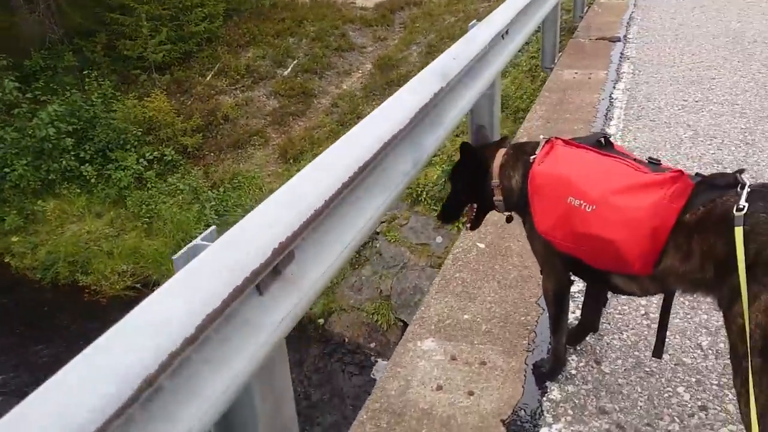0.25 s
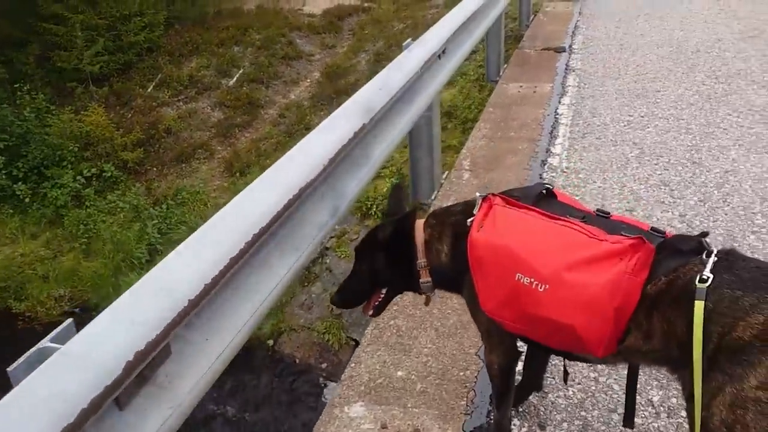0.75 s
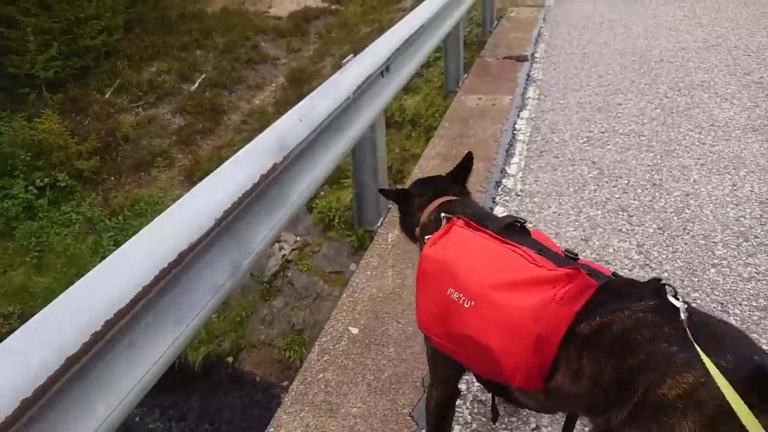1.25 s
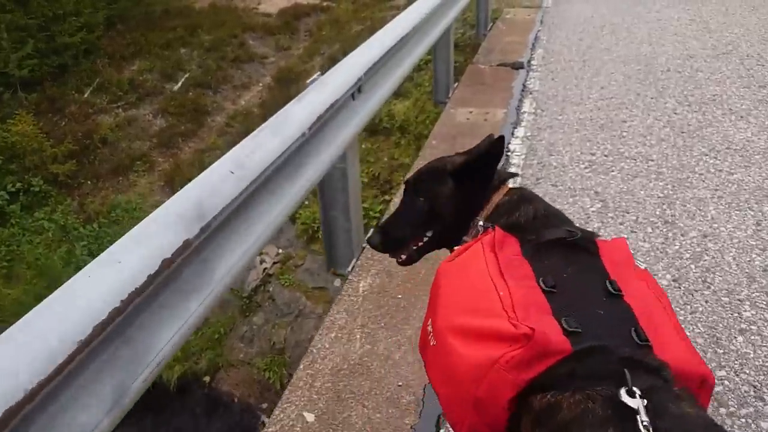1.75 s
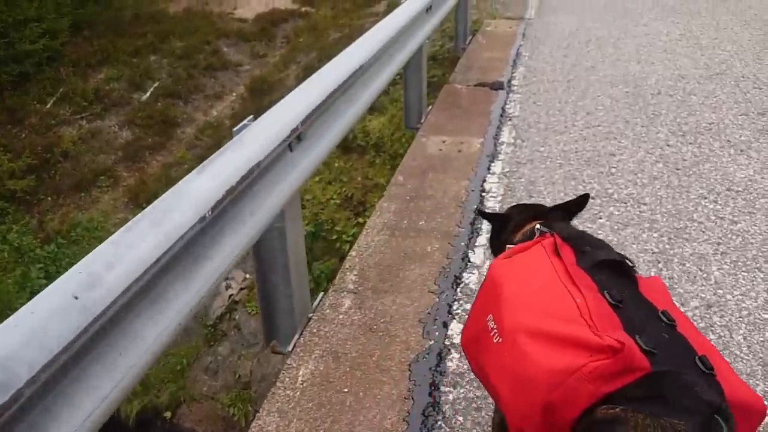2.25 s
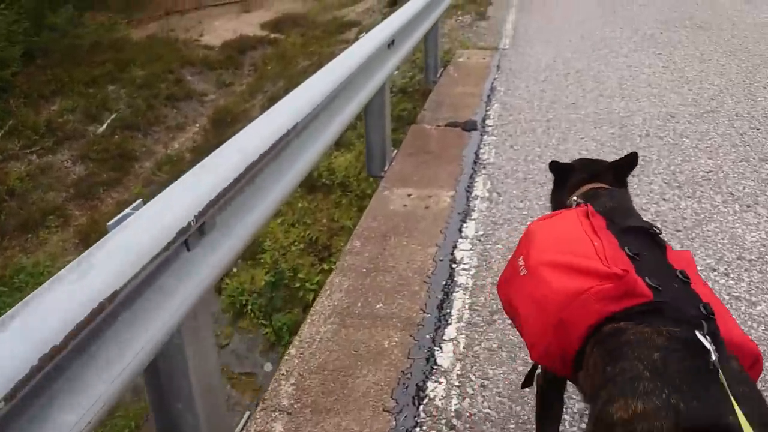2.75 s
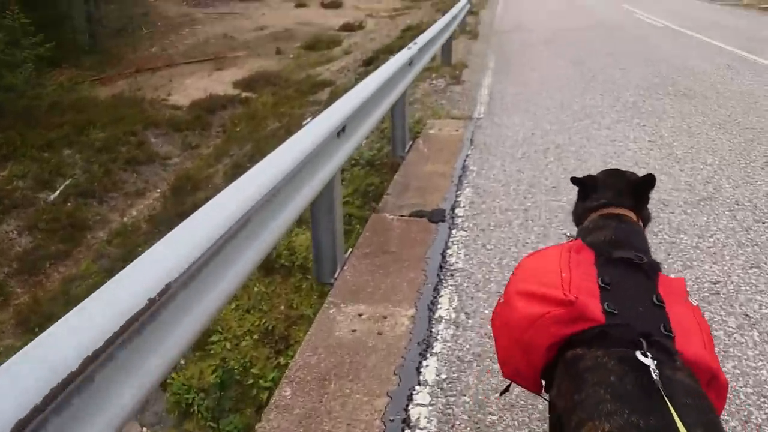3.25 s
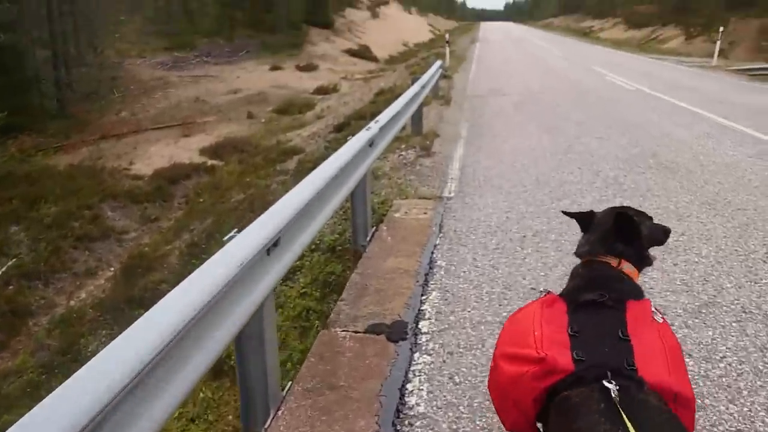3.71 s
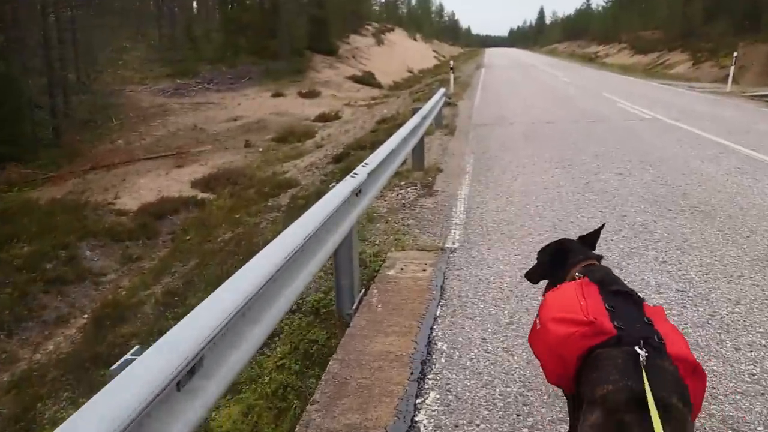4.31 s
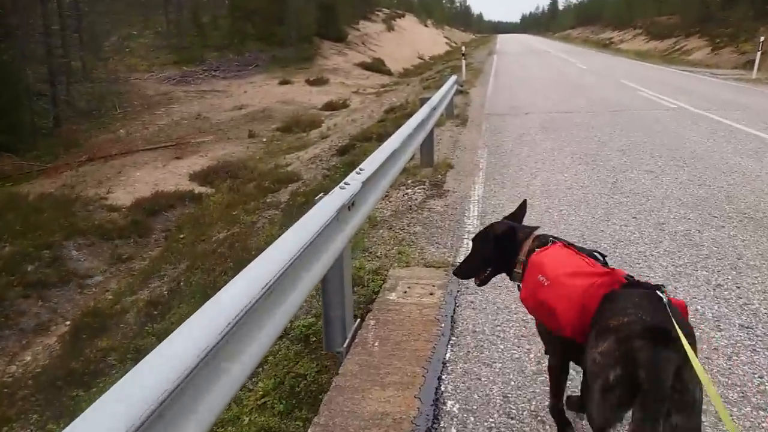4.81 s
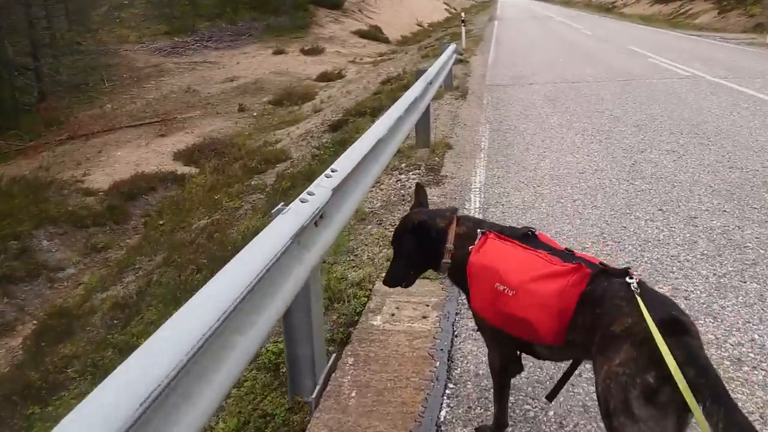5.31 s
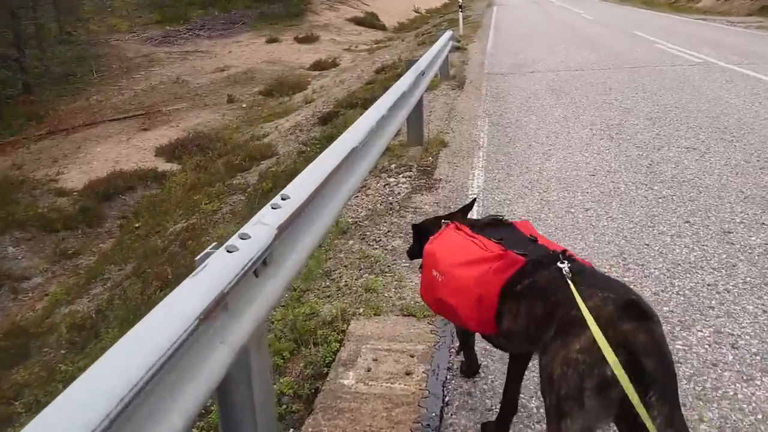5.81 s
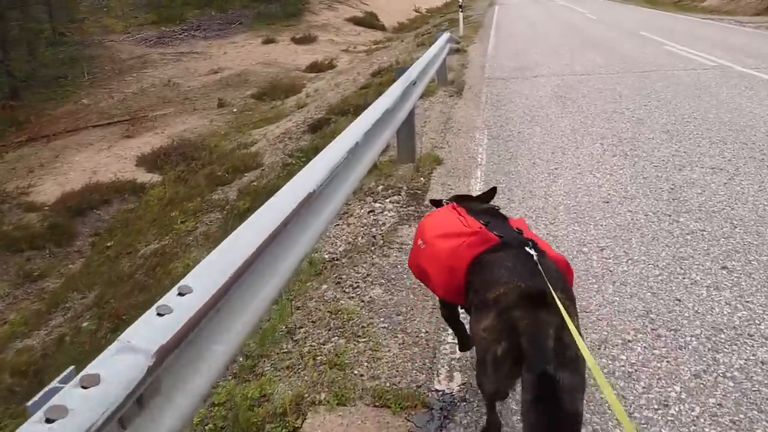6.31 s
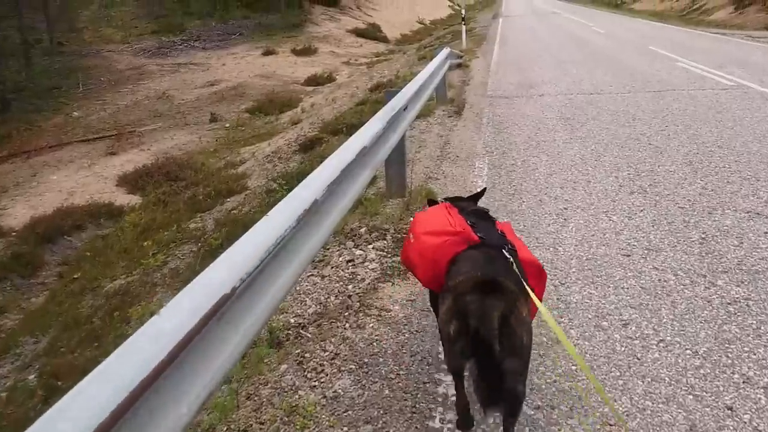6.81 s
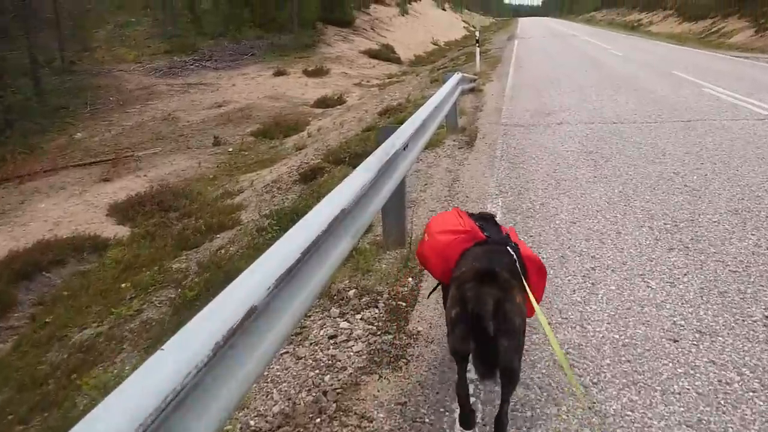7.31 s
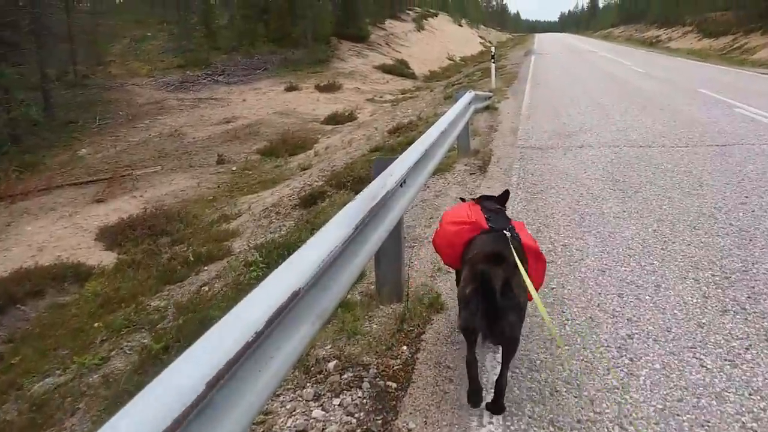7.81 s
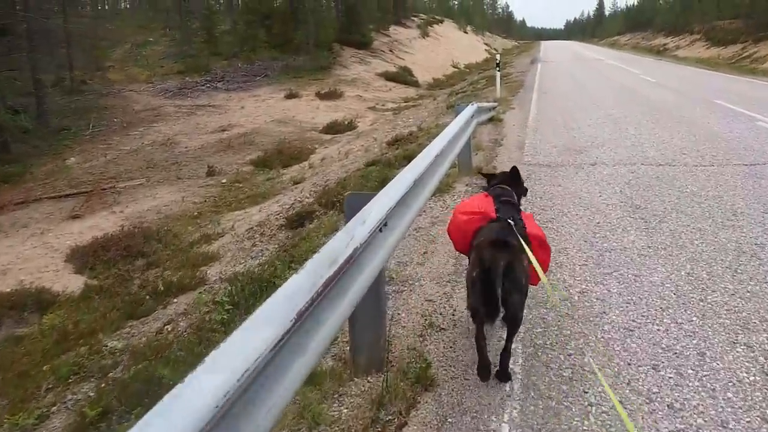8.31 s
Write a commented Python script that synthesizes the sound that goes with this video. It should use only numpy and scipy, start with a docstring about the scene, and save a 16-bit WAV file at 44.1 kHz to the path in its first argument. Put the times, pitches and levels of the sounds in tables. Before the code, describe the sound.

A small stream rushes and gurgles steadily under a road bridge, with two sharp plastic snaps, a brief creaking crackle and soft gritty footsteps.

```python
"""Stream under a forest road bridge

A small stream rushes over stones: a shaped noise wash, ringing bubbles and noisy droplet splats.
A hand-held camera's plastic case snaps, creaks in the grip and snaps again: jolts and scrapes ring its modes.
Soft steps land on gritty asphalt as damped thuds, knocks and grains, with single ticks of grit.
A light breeze buffets the two microphone ports as low noise, and the water's spray dulls with distance."""
import sys
import numpy as np
from scipy import signal
from scipy.fft import rfft, irfft
from scipy.io import wavfile
from scipy.ndimage import uniform_filter1d

SR = 44100
rng = np.random.default_rng(int(sys.argv[2]) if len(sys.argv) > 2 else 0)


def output_pcm(signal):
    """Save a mono or channel-first signal as 16-bit PCM at the path in sys.argv[1].

    Samples are clipped to [-1, 1] before scaling.
    """
    pcm = np.clip(np.atleast_2d(signal).T, -1, 1) * 32767
    wavfile.write(sys.argv[1], SR, np.round(pcm).astype(np.int16))


N = 377040

# stream along the walk: (time [s], body [dB], spray [dB], gurgle [dB])
STREAM_LEVELS = [(0, 0.6, 0, -4.5), (1.6, -1.5, 1.8, 1), (2.4, 1, 1.5, 0.5), (3.1, -0.8, 1.4, -2),
                 (4.4, 1.1, 1, 3.5), (5.3, 1.5, 2, 1.2), (5.8, -0.5, -2, -2), (6.5, -0.2, -0.6, 3.5),
                 (7.5, -1.1, -3.0, 0.5), (8.55, -2.5, -4.5, 2.5)]
# colour of the stream: (frequency [Hz], left [dB], right [dB])
STREAM_COLOUR = [(100, -20, -27), (209, -24.5, -16.5), (283.5, -7.5, -4), (382, -7, -1), (650, -4, -3),
                 (870, -2, -2.5), (2140, -8.5, -6.5), (3340, -21, -11.5), (4600, -16, -15),
                 (7420, -28, -18), (7830, -32, -28.5), (8940, -23.5, -24.5), (12600, -20.5, -25.5),
                 (16000, -23.5, -31)]
# likeness of the stream at the two ports: (frequency [Hz], likeness [0-1])
PORT_LIKENESS = [(100, 0.16), (260, 1), (430, 0.99), (700, 0.54), (1050, 0.61), (2000, 0.27), (4700, 0.27),
                 (9000, 0.05)]
# direction of the stream: (time [s], lead of the left port [ms])
STREAM_BEARING = [(0, 0.36), (1.5, 0.38), (3, 0.47), (8.55, 0.46)]
# beyond the bridge the deepest gurgle is hidden and the road reflects the stream:
# (time [s], pitch of the low end [ratio], echo share [0-1])
STREAM_PLACE = [(0, 0.87, 0.00063), (4.5, 0.96, 0), (6.6, 0.96, 0.13), (8.55, 1.76, 0.17)]
# largest bubbles: (time [s], starting pitch [Hz], level [dB])
LARGE_BUBBLES = [(1.25, 560, -32.5), (1.42, 407, -32.5), (2.435, 345, -32.5), (2.96, 857, -41),
                 (3.23, 1235, -35.5), (3.56, 274, -35), (3.75, 473, -36), (3.84, 299, -33.5),
                 (4.04, 460, -33.5), (4.275, 1450, -34), (4.33, 378, -34), (4.39, 1130, -41),
                 (4.44, 387, -34.5), (4.92, 400, -31.5), (4.95, 1690, -31), (5.09, 340, -36),
                 (5.19, 1125, -39), (5.27, 670, -35), (5.31, 850, -40), (6.125, 315, -32),
                 (6.18, 318, -36.5), (6.395, 360, -31), (6.46, 282, -37.5), (6.53, 304, -38),
                 (6.76, 650, -40), (6.91, 397, -39), (6.99, 510, -38), (7.10, 434, -35), (7.13, 955, -42),
                 (7.20, 338, -35), (7.56, 367, -37.5), (8.28, 1110, -48), (8.38, 552, -41)]
# colour of bursting droplets: (frequency [Hz], level [dB])
SPRAY_COLOUR = [(500, -22), (1500, 1.5), (2600, -2.5), (5000, -0.5), (7000, -9.5), (8200, -15.5),
                (11000, -8.5), (15500, -8)]
# breeze before the cut at each port, freer on the open road: (time [s], level [dB])
BREEZE_LEVELS = [(0, -64.5), (2.3, -65), (3.25, -71), (3.45, -59.5), (4.15, -63), (4.35, -55), (4.7, -62),
                 (4.9, -53), (5.6, -55), (5.95, -61), (6.2, -58.5), (6.55, -55.5), (6.8, -60), (7.2, -64),
                 (7.5, -61), (7.85, -58), (8.1, -53.5), (8.55, -54.5)]
# single eddies that swell the breeze: (time [s], level before the cut at each port [dB])
EDDY_PUFFS = [(2.96, -51), (3.41, -62), (3.53, -52), (3.82, -59), (3.94, -49), (4.33, -62), (5.13, -57),
              (5.58, -48.5), (6.15, -54), (8.24, -57), (8.31, -58)]
# colour of the breeze: (frequency [Hz], level [dB])
BREEZE_COLOUR = [(10, -26), (25, 0.5), (45, 3.5), (80, 0.5), (150, -11), (300, -45), (900, -48)]
# steps on the asphalt: (time [s], thud [dB], thud pitch [Hz], knock [dB], grit [dB],
# toe delay [s], toe thud [dB], toe pitch [Hz])
FOOTSTEPS = [(0.876, -43, 149, -52, -53, 0.05, -46, 150), (2.15, -54.5, 170, -60, -58, .065, -51, 150),
             (2.746, -42.5, 168, -58, -66, .025, -52, 130), (3.320, -52.5, 130, -57, -48, 0.067, -59, 150),
             (4.27, -62, 200, -58, -41.5, .088, -50.5, 150), (4.757, -42, 175, -39, -38, 0.062, -41, 150),
             (5.279, -50, 200, -48, -58, 0.058, -55, 150), (5.772, -45, 170, -34.5, -39.5, .080, -50, 140),
             (6.285, -59, 150, -47, -40.5, .065, -66, 150),
             (6.802, -42.5, 168, -38, -36.5, 0.069, -49, 170), (7.312, -53, 160, -42, -49, 0.074, -60, 150),
             (7.910, -45, 160, -45, -58, .098, -42, 252), (8.409, -43, 110, -60, -61, 0.078, -53, 150)]
# colour of crushed grit: (frequency [Hz], level [dB])
GRIT_COLOUR = [(400, -20), (1200, -14), (3000, 9), (6500, 7), (8200, -4.5), (11000, 2), (15500, -9)]
# single bits of grit underfoot: (time [s], level [dB])
GRIT_TICKS = [(2.1994, -44), (2.4996, -44), (2.7077, -42), (2.9177, -40.5), (3.3258, -42), (3.3932, -42),
              (4.3226, -43), (4.345, -44), (4.5396, -42), (4.8703, -40)]
# the case slips in the grip, in runs and a last faint tick:
# (time [s], strength [dB], brightness [dB], ring of the wall before damping [dB])
GRIP_SLIPS = [(0.8792, -3, -8.5, -4), (0.908, -0.5, -6, 4), (.9192, -5, -6, 4), (0.9346, 0.5, -2, 5),
              (0.9428, -2.5, -6, -1), (0.9546, 3, -3, 2), (.9630, -1, -7, -3), (.973, 4, -4, 3.5),
              (.9802, -6, -5, 0), (0.9898, 4, -3, 1), (1.004, 4, -2, 2.5), (1.0172, 4, 1, 5),
              (1.0292, -.5, -4, 4.5), (1.0402, -2, -7, 6), (1.051, 0, -2, 7), (1.0601, 3.2, -1, 3),
              (1.0698, 8, 2, -6), (1.0788, 6.5, 3, -1), (1.0868, 6.5, 2, -8), (1.0962, 1.5, 3, 6),
              (1.1053, -3.5, -6, 8), (1.1276, -7, -2, 5), (1.1343, 0.5, 3, 5.5), (1.1419, 4.5, 5.5, -1),
              (1.1493, 6.5, -2, -7), (1.1565, -1, -4, 8.5), (1.1653, 0, 5, -12), (1.172, -8.5, -3, 11),
              (1.2064, -13, -11, 3)]
# modes of the case before the grip shifts them: (frequency [Hz], width [Hz], level [dB])
CASE_MODES = [(438, 85, 1), (780, 61, -1), (968, 69, 4), (1256, 87, 7.5), (1433, 81, 7), (1567, 46, -4),
              (1690, 40, 2.5), (2250, 190, -2.5), (2600, 130, -3), (2820, 110, -3), (3180, 89, 0),
              (3525, 73, 1), (4800, 1400, -5), (5600, 460, -6), (6720, 190, 0), (7420, 260, -4.5),
              (9700, 4100, -18), (11930, 590, -8), (14700, 670, -8)]
# the case at the left port, farther from the grip: (frequency [Hz], level against the right [dB])
CASE_FAR_PORT = [(400, -5.5), (800, -8.5), (1400, 0.5), (2000, -7), (3000, -13.5), (5000, -12),
                 (9000, -18.5), (13000, -7), (15000, -12)]
# snaps of a seam: (time [s], energy [dB], low cut-off [Hz], rebound delay [s], rebound [dB])
SEAM_SNAPS = [(.5528, 8, 380, .0036, -11.5), (1.8662, 6.5, 640, .0044, -14)]
# modes of the seam: (frequency [Hz], width [Hz], first snap [dB], second snap [dB])
SEAM_MODES = [(463, 93, -1.5, -24), (600, 110, -16, -24), (880, 120, -12, -11), (1034, 83, -2, 7),
              (1220, 140, -8, -8), (1595, 83, 5, -13), (1940, 140, 0.5, -4), (2220, 210, -15, -1),
              (2400, 84, -16, -12), (2790, 150, -0.5, -20), (3500, 260, -16, -9.5), (4150, 340, -2.5, -12),
              (4840, 280, -0.5, -1), (5530, 300, -3, -18), (6700, 350, -5.5, -11), (7200, 200, -9, -12),
              (11300, 950, -15, -37), (14500, 1800, -22, -28)]
# the seam at the left port: (frequency [Hz], level against the right [dB])
SEAM_FAR_PORT = [(450, -5.5), (1000, -11), (1500, -6.5), (2200, -6.5), (3000, -8), (4500, -10.5),
                 (9000, -16), (13000, -5)]

SURGE_HZ, SURGE_DB = 2.5, 0.42  # the whole flow surges a little
GULP_HZ, GULP_DB = 4, 1.4  # the hollows fill and empty faster
ROAD_ECHO_S, ROAD_ECHO_HZ = 0.000487, 4470  # echo delay; rough asphalt scatters what lies higher
GUST_HZ, GUST_DB = 9, 2.5  # how fast and how far the breeze gusts
KNOCK_HZ = 363  # the hard rim of the sole
TOE_KNOCK_DB, TOE_GRIT_DB = -15, -15  # the toe against the heel
WALL_HZ, WALL_OCTAVES = 1220, 0.77  # centre and reach of the wall's ring
WALL_DAMP_DB = 0.5  # the hand damps the wall
EDGE_HZ = 15850  # upper band limit


def amp(db):
    """Turns decibels into amplitude."""
    return 10 ** (np.asarray(db) / 20)


def unit(x):
    """Scales x to rms 1."""
    return x / np.sqrt(np.mean(x ** 2) + 1e-20)


def at_hz(table, hz, axis=1):
    """Reads a column of a spectrum on a log-frequency axis."""
    rows = np.array(table, float)
    return np.interp(np.log(hz + 1), np.log(rows[:, 0] + 1), rows[:, axis])


def at_time(table, t, axis=1):
    """Reads a column of a curve over time."""
    rows = np.array(table, float)
    return np.interp(t, rows[:, 0], rows[:, axis])


def add(mix, s, sound):
    """Lays a sound into the mix from s seconds on."""
    part = mix[:, max(round(s * SR), 0):][:, :sound.shape[-1]]
    part += sound[..., :part.shape[-1]]


def coloured(x, table):
    """Gives x a spectrum, at rms 1."""
    size = x.shape[-1]
    gain = amp(at_hz(table, np.fft.rfftfreq(size, 1 / SR)))
    return unit(irfft(rfft(x) * gain, size))


def wander(t, top_hz, count=24):
    """Slow chance at rms 1: sines of random phase, up to top_hz."""
    rates = top_hz * np.geomspace(1 / 10, 1, count)
    return unit(sum(np.sin(2 * np.pi * (hz * t + rng.random())) for hz in rates))


def resonance(hz, centre_hz, width_hz):
    """Power response of one mode."""
    return 1 / (1 + ((hz ** 2 - centre_hz ** 2) / (width_hz * (hz + 1))) ** 2)


def ringing(modes, hz):
    """Gain of a body whose modes add in power."""
    return np.sqrt(sum(amp(db) ** 2 * resonance(hz, f, width) for f, width, db in modes))


def causal(gain):
    """The minimum-phase response with this gain, which rings only after the blow."""
    log_gain = np.log(np.maximum(gain, 1e-5))
    circle = np.concatenate([log_gain, log_gain[-2:0:-1]])
    return np.exp(np.conj(signal.hilbert(circle)))[:len(gain)]


def road_echo(hz, t):
    """Gain of the direct sound plus its echo off the road."""
    share = np.clip(at_time(STREAM_PLACE, t, axis=2), 0, 1) / (1 + (hz / ROAD_ECHO_HZ) ** 2)
    return np.abs(1 + share * np.exp(-2j * np.pi * hz * ROAD_ECHO_S))


def patches(noise, frames, bins):
    """Smooths noise over time and frequency into patches, at rms 1."""
    return unit(uniform_filter1d(uniform_filter1d(noise, size=frames, axis=0), size=bins, axis=1))


def rush(level_db=-46, patch_db=2.0, flicker_db=1.0, tumble_db=1.5, hollow_hz=650, spray_hz=3000):
    """Countless far bubbles merge to a wash, with splashes coming and going in patches."""
    hz = np.fft.rfftfreq(1024, 1 / SR)
    t = np.arange(N // 256 + 5)[:, None] * 256 / SR
    a, b, c, d, splash, tumble = rng.standard_normal((6, len(t), len(hz)))
    splash = patches(splash, frames=4, bins=8)
    tumble = patches(tumble, frames=9, bins=4)
    flicker = unit(uniform_filter1d(rng.standard_normal(t.shape), size=4, axis=0))

    low = 1 / (1 + (hz / hollow_hz) ** 4)
    high = 1 / (1 + (spray_hz / (hz + 1)) ** 4)
    gurgle_db = at_time(STREAM_LEVELS, t, axis=3) + GULP_DB * wander(t, GULP_HZ) + tumble_db * tumble
    spray_db = at_time(STREAM_LEVELS, t, axis=2) + flicker_db * flicker
    body_db = at_time(STREAM_LEVELS, t)
    field_db = low * gurgle_db + high * spray_db + (1 - low - high) * body_db
    field_db = field_db + SURGE_DB * wander(t, SURGE_HZ) + patch_db * splash * (1 - high / 2)

    same = np.clip(at_hz(PORT_LIKENESS, hz), 0, 1)
    right = a + 1j * b
    lead = np.exp(2j * np.pi * hz * at_time(STREAM_BEARING, t) / 1000)  # ms to s
    left = same * right * lead + np.sqrt(1 - same ** 2) * (c + 1j * d)

    colour_hz = hz / at_time(STREAM_PLACE, t) ** low  # shifts only the low end
    left = left * amp(at_hz(STREAM_COLOUR, colour_hz))
    right = right * amp(at_hz(STREAM_COLOUR, colour_hz, axis=2))
    ports = np.array([left, right]) * amp(field_db) * road_echo(hz, t)
    wash = signal.istft(ports.swapaxes(1, 2), nperseg=1024, noverlap=768)[1][:, :N]
    return amp(level_db) * unit(wash)


def bubble(t, hz, decay_s, rise):
    """A pocket of air rings and climbs in pitch as it nears the surface."""
    age = t / decay_s
    onset = 1 - np.exp(-t * hz / 2)
    return np.sin(2 * np.pi * hz * t * (1 + rise * age / 2)) * np.exp(-age) * onset


def bubbles(level_db=-53.0, per_s=260, spread_db=5.0, cycles=8, rise=0.026, low_hz=290, high_hz=2600,
            slope_db=4.5, left_db=-2, count=36):
    """Nearer bubbles ring one by one at random, the small ones higher and dying sooner."""
    t, now, swarm = np.arange(8192) / SR, np.arange(N) / SR, np.zeros(N)
    for hz in np.geomspace(low_hz, high_hz, count):
        births = rng.random(N) < per_s / count / SR
        train = births * amp(spread_db * np.minimum(rng.exponential(1, N), 3.5))
        rings = signal.oaconvolve(train, bubble(t, hz, cycles / hz, rise))[:N]
        swarm += rings * amp(slope_db * np.log10(hz / low_hz))  # slope in dB per decade
    right = unit(swarm) * amp(level_db + at_time(STREAM_LEVELS, now))
    left = np.interp(now + at_time(STREAM_BEARING, now) / 1000, now, right)  # ms to s
    return np.array([amp(left_db) * left, right])


def droplets(level_db=-60, per_s=260, spread_db=3.3, burst_s=0.0011, left_db=-2, count=16):
    """Thrown drops fall back with tiny sharp splats of noise, which fade as the spray recedes."""
    out, t = np.zeros((2, N)), np.arange(512) / SR
    for _ in range(count):
        births = rng.random(N) < per_s / count / SR
        train = births * amp(spread_db * np.minimum(rng.exponential(1, N), 3))
        splat = coloured(rng.standard_normal((2, len(t))), SPRAY_COLOUR) * np.exp(-t / burst_s)
        out += signal.oaconvolve(train[None], splat, axes=1)[:, :N]
    spray_db = at_time(STREAM_LEVELS, np.arange(N) / SR, axis=2)
    return unit(out) * amp(level_db + spray_db) * amp([[left_db], [0]])


def lesser_plops(level_db=-42, spread_db=2, low_hz=380, high_hz=2400, count=28):
    """Middling bubbles at random, low ones more often: (time [s], starting pitch [Hz], level [dB])."""
    return [(when * N / SR, low_hz * (high_hz / low_hz) ** (small ** 2), level_db + spread_db * (2 * near - 1))
            for when, small, near in rng.random((count, 3))]


def plops(ring_s=0.011, rise=0.016, left_db=-2, lead_s=0.00021):
    """Large bubbles ring close under the bridge, reaching the left port first."""
    out, t = np.zeros((2, N)), np.arange(8192) / SR
    late = np.maximum(t - lead_s, 0)
    for s, hz, db in list(LARGE_BUBBLES) + lesser_plops():
        left = amp(left_db) * bubble(t, hz, ring_s, rise)
        right = bubble(late, hz, ring_s, rise)
        add(out, s, amp(db) * np.array([left, right]))
    return out


def breeze(left_db=-8.0, right_db=-2.0, puff_s=0.018):
    """Eddies come in shared gusts and buffet each port with its own low noise."""
    t = np.arange(N) / SR
    gust = amp(at_time(BREEZE_LEVELS, t) + GUST_DB * wander(t, GUST_HZ, count=10))
    gust = gust + sum(amp(db) * np.exp(-((t - s) / puff_s) ** 2) for s, db in EDDY_PUFFS)
    buffet = coloured(rng.standard_normal((2, N)), BREEZE_COLOUR)
    return buffet * gust * amp([[left_db], [right_db]])


def footfalls():
    """Each step lands heel then toe: (time [s], thud [dB], thud pitch [Hz], knock [dB], grit [dB])."""
    for s, thud_db, thud_hz, knock_db, grit_db, toe_s, toe_db, toe_hz in FOOTSTEPS:
        yield s, thud_db, thud_hz, knock_db, grit_db
        yield s + toe_s, toe_db, toe_hz, knock_db + TOE_KNOCK_DB, grit_db + TOE_GRIT_DB


def steps(thud_s=0.0079, knock_s=0.0065, scuff_s=0.03, scuff_db=-7, grit_s=0.01, grain_db=14.0,
          sole_width_hz=260, left_db=-5.5, right_db=0.0):
    """A sole lands with a dull thud and a knock of its rim, scuffs, and crushes loose grit."""
    out, t, hz = np.zeros((2, N)), np.arange(8192) / SR, np.fft.rfftfreq(8192, 1 / SR)
    landing = 1 - np.exp(-t / 0.0021)  # soft onset
    for s, thud_db, thud_hz, knock_db, grit_db in footfalls():
        grains = rng.standard_normal((2, len(t)))
        grains = grains * amp(grain_db * np.minimum(rng.exponential(1, (2, len(t))), 4))
        sound = amp(grit_db) * coloured(grains, GRIT_COLOUR) * np.exp(-t / grit_s)
        for db, ring_hz, ring_s in (thud_db, thud_hz, thud_s), (knock_db, KNOCK_HZ, knock_s):
            sole = np.sqrt(resonance(hz, ring_hz, sole_width_hz) / (1 + (hz / 900) ** 2))
            rub = unit(irfft(rfft(rng.standard_normal(len(t))) * sole))
            scuff = amp(scuff_db) * rub * np.exp(-t / scuff_s)
            ring = 2 * np.sin(2 * np.pi * ring_hz * t) * np.exp(-t / ring_s)
            sound = sound + amp(db) * (ring + scuff)
        add(out, s, sound * landing * amp([[left_db], [right_db]]))
    return out


def ticks(decay_s=0.0038, left_db=-3):
    """A bit of grit cracks against the asphalt in a short burst of noise."""
    out, t = np.zeros((2, N)), np.arange(1024) / SR
    for s, db in GRIT_TICKS:
        burst = coloured(rng.standard_normal((2, len(t))), GRIT_COLOUR) * np.exp(-t / decay_s)
        add(out, s, amp(db) * burst * amp([[left_db], [0]]))
    return out


def crack(energy_db, body, far_port, rough, rough_hz, slip_s, rise_s, tail_db, tail_s, shudder_hz,
          rebound_s, rebound_db, travel_s, lag_s=0.00032, size=4096):
    """A slip of plastic, clean jolt plus rough scrape, rebounds once, rings the body and reaches both ports."""
    t, hz = np.arange(size) / SR, np.fft.rfftfreq(size, 1 / SR)
    # bending waves carry the treble faster than the bass; travel_s is the time at 1 kHz
    jolt = np.exp(-4j * np.pi * travel_s * np.sqrt(1000 * hz))
    jolt = jolt * (1 + amp(rebound_db) * np.exp(-2j * np.pi * hz * rebound_s))

    force = np.exp(-t / slip_s) * (1 - np.exp(-(t / rise_s) ** 2))
    force = force + amp(rebound_db) * np.interp(t - rebound_s, t, force)
    strength = np.linalg.norm(force)
    noise = rfft(rng.standard_normal((2, size)) * force / strength)
    shudder = rfft(rng.standard_normal((2, size)) * amp(tail_db) * np.exp(-t / tail_s) / strength)
    scrape, stray = noise + shudder / np.sqrt(1 + (hz / shudder_hz) ** 2)  # the long tail is duller

    rough = 1 - (1 - np.clip(rough, 0, 1)) / (1 + (hz / rough_hz) ** 2)  # the treble is mostly scrape
    near = np.sqrt(1 - rough) * jolt + np.sqrt(rough) * scrape
    same = 1 / (1 + (hz / 5000) ** 2)  # short waves scatter on their way across the case
    far = (same * near + np.sqrt(1 - same ** 2) * stray) * np.exp(-2j * np.pi * hz * lag_s)
    left = irfft(far * causal(body * amp(at_hz(far_port, hz))))
    right = irfft(near * causal(body))
    return amp(energy_db) * np.array([left, right])[:, :size // 2] / np.linalg.norm(right)


def creak(level_db=0.0, detune=0.008, scatter_db=3.5, rebound_s=0.0043, rebound_spread=0.15):
    """Stick and slip: each slip jolts the case, and the shifting grip alters its modes a little."""
    out, hz = np.zeros((2, N)), np.fft.rfftfreq(4096, 1 / SR)
    treble = at_hz([(5000, 0), (11000, 1)], hz)  # (frequency [Hz], share of the brightness [0-1])
    wall = np.exp(-(np.log2((hz + 1) / WALL_HZ) / WALL_OCTAVES) ** 2)
    for s, strength_db, bright_db, ring_db in GRIP_SLIPS:
        shifts = rng.standard_normal((len(CASE_MODES), 2))
        modes = [(f * (1 + detune * bend), width, db + scatter_db * damp)
                 for (f, width, db), (bend, damp) in zip(CASE_MODES, shifts)]
        case = ringing(modes, hz)
        body = case * amp(bright_db * treble + (ring_db - WALL_DAMP_DB) * wall)
        # a brighter or more ringing body also carries more energy
        body_db = 20 * np.log10(np.linalg.norm(body) / np.linalg.norm(case))
        rebound = rebound_s * np.exp(rebound_spread * rng.standard_normal())
        slip = crack(level_db + strength_db + body_db, body, CASE_FAR_PORT, rough=0.18, rough_hz=2380,
                     slip_s=0.0011, rise_s=0.0008, tail_db=-16.5, tail_s=0.0089, shudder_hz=8000,
                     rebound_s=rebound, rebound_db=-11.5, travel_s=0.001793)
        add(out, s, slip)
    return out


def snaps():
    """A seam snaps at two places, each favouring other modes."""
    out, hz = np.zeros((2, N)), np.fft.rfftfreq(4096, 1 / SR)
    for k, (s, energy_db, lowest_hz, rebound_s, rebound_db) in enumerate(SEAM_SNAPS):
        modes = [(f, width, dbs[k]) for f, width, *dbs in SEAM_MODES]
        seam = ringing(modes, hz) / np.sqrt(1 + (lowest_hz / (hz + 1)) ** 8)
        snap = crack(energy_db, seam, SEAM_FAR_PORT, rough=0.11, rough_hz=9000,
                     slip_s=0.0014, rise_s=0.0009, tail_db=-12.5, tail_s=0.0055, shudder_hz=9000,
                     rebound_s=rebound_s, rebound_db=rebound_db, travel_s=0.001097)
        add(out, s, snap)
    return out


def scene():
    """The stream, the breeze, the steps and the camera case at the two ports."""
    return rush() + bubbles() + droplets() + plops() + breeze() + steps() + ticks() + creak() + snaps()


def record(dry, notch_hz=6850, notch_width_hz=520, notch_db=-22):
    """The left port is nearly deaf in one narrow treble band; then both ports are band-limited."""
    hz = np.fft.rfftfreq(N, 1 / SR)
    notch = amp(notch_db * np.exp(-((hz - notch_hz) / notch_width_hz) ** 4))
    ports = np.array([irfft(rfft(dry[0]) * notch, N), dry[1]])
    band = signal.firwin(511, EDGE_HZ, window=("kaiser", 9), fs=SR)
    return signal.oaconvolve(ports, band[None], "same")


dry = scene()
out = record(dry)
output_pcm(out)
```